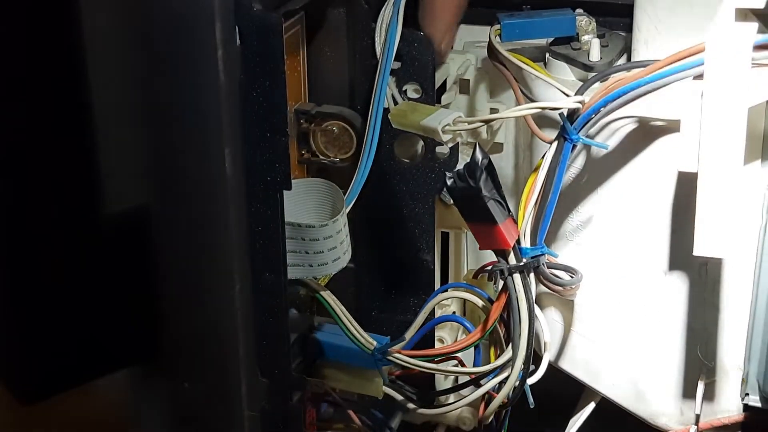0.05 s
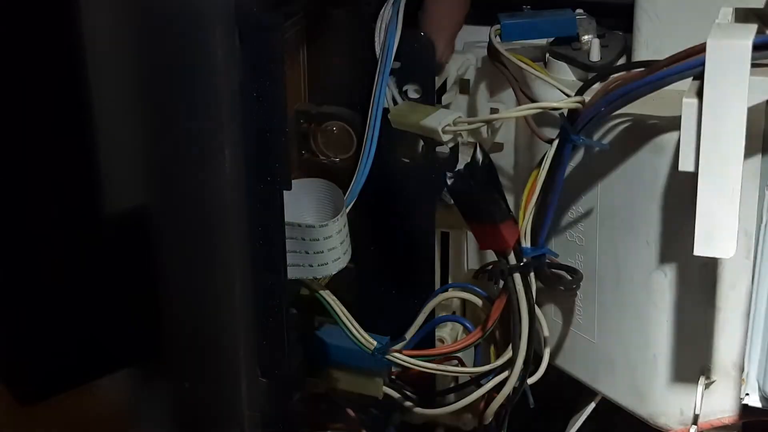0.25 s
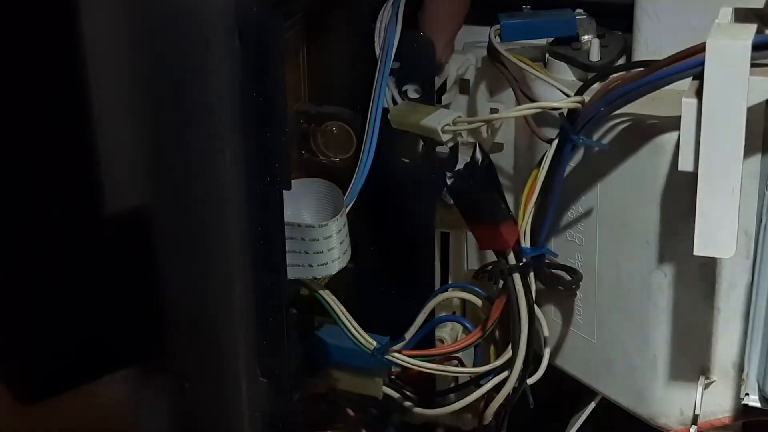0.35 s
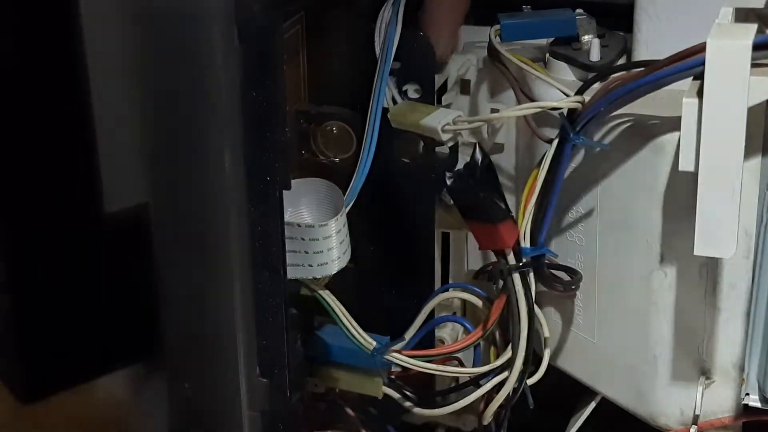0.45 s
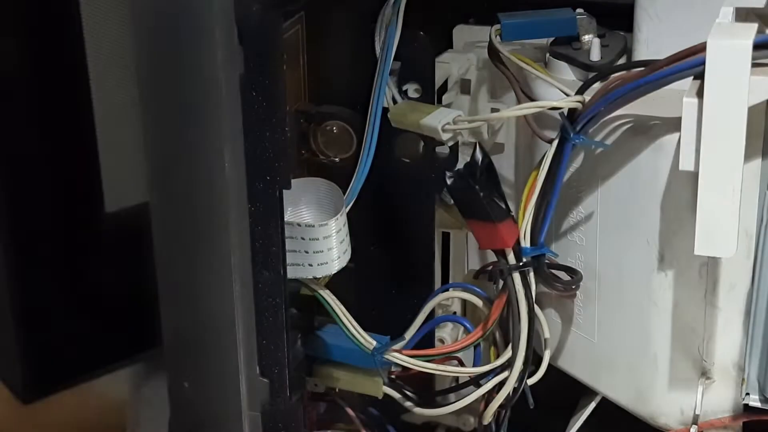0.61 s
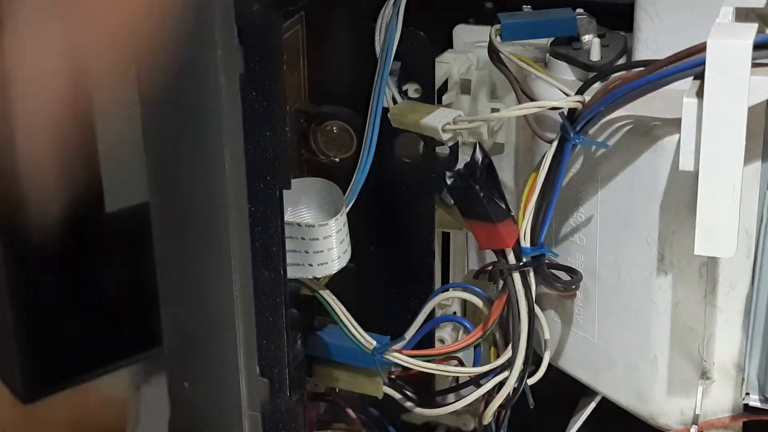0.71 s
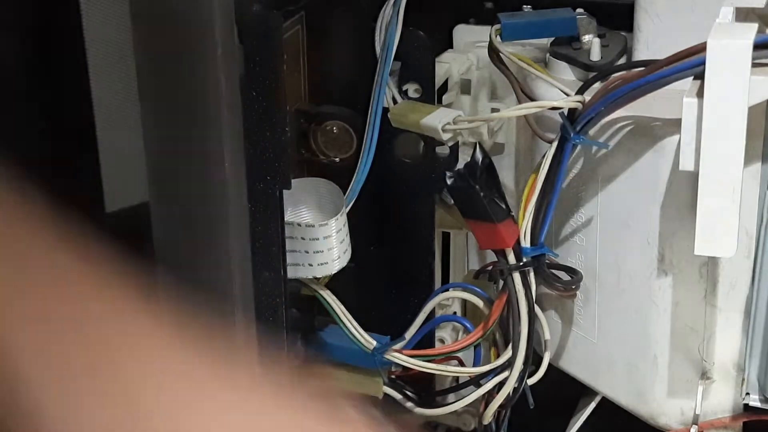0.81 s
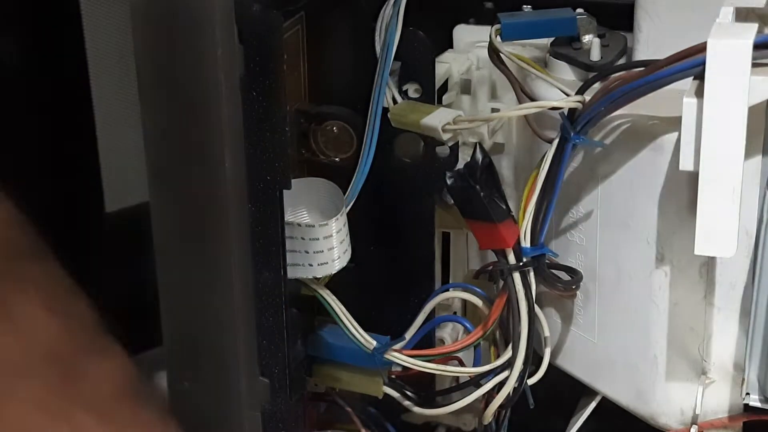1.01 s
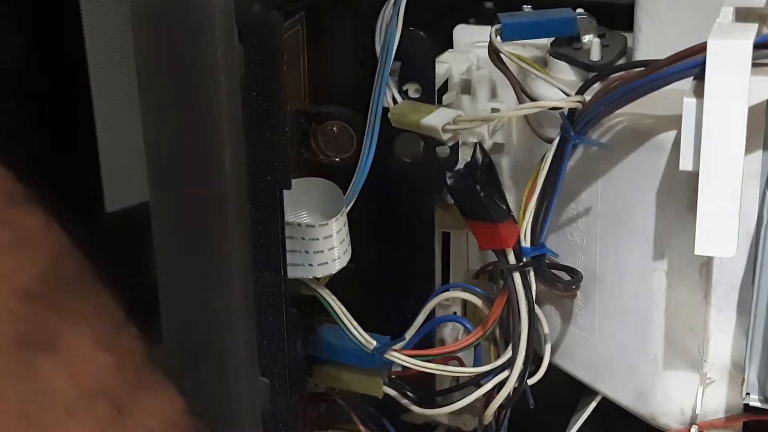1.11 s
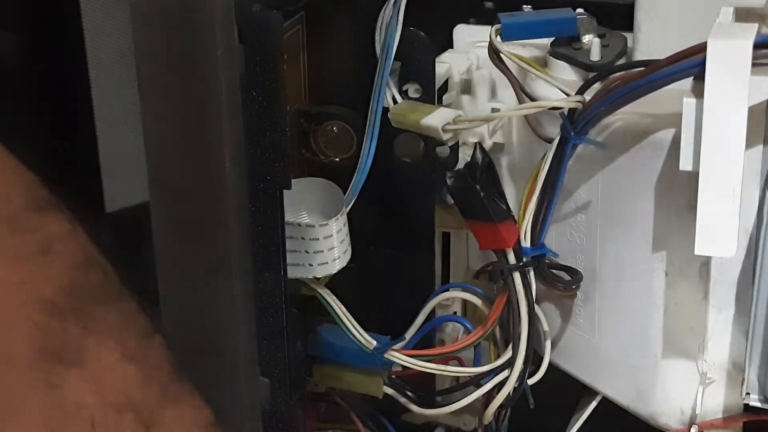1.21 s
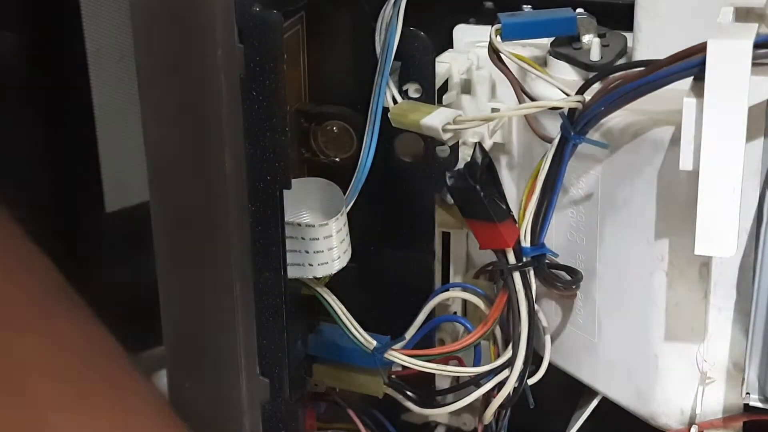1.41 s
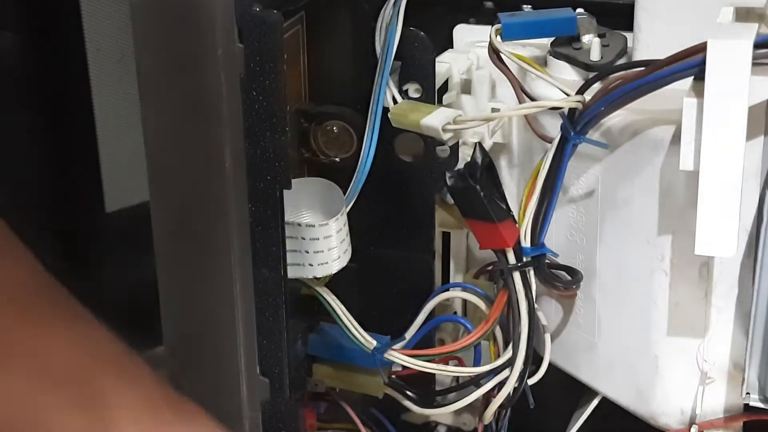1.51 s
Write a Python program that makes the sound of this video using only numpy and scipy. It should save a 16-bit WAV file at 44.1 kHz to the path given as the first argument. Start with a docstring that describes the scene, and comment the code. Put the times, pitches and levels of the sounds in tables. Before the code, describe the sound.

A microwave door bumps softly, then two latches snap shut in quick succession, rattling plastic and briefly ringing the steel cabinet. A hand faintly brushes the casing and air puffs at the close microphone, over low room hum.

```python
"""A low room hum and a hand brushing steel: an opened-up microwave oven in a small room, stereo mic close by.
The door bumps the latches with a dull thud and a short boom, and a hook ticks. Two latches then snap one after
the other, rattling loose plastic and ringing the sheet-steel cabinet. A faint squeak follows, then a soft touch
as a sleeve brushes past. A passing arm stirs the air at the microphone."""
import sys
import numpy as np
from scipy import signal
from scipy.fft import rfft, irfft, next_fast_len
from scipy.io import wavfile
from scipy.ndimage import uniform_filter1d, map_coordinates

SR = 44100
rng = np.random.default_rng(int(sys.argv[2]) if len(sys.argv) > 2 else 0)


def dump(signal):
    """Clip the signal to [-1, 1] and save it as 16-bit WAV at the path in sys.argv[1]."""
    limited = np.clip(np.atleast_2d(signal).T, -1, 1)
    pcm = np.round(limited * 32767).astype(np.int16)
    wavfile.write(sys.argv[1], SR, pcm)


N = 68355

# how alike the channels are, for close sound and for the room: freq_hz, correlation (capped at 1)
NEAR_ALIKE = [(60, 0), (180, 2), (550, 0.67), (1650, 0.2), (5000, 0)]
FAR_ALIKE = [(60, 0.34), (180, 1), (550, 0.58), (1650, .02)]
# stereo lean at the mic: freq_hz, left_minus_right_db
BALANCE = [(150, 1), (400, 3), (950, -.5), (2400, 2), (6000, -1), (11000, 3)]
# spectra of the noisy sounds: freq_hz, relative_db
HUM_COLOUR = [(25, -30), (100, -12.5), (240, -0.5), (470, -1), (750, -8.5), (1000, -7), (1600, -20.5),
              (4500, -40), (8000, -38), (15500, -54.5)]
BRUSH_COLOUR = [(300, 9.5), (1500, 7), (3500, -0.5), (8500, 3.5), (12500, 0), (15500, -1)]
DRAUGHT_COLOUR = [(20, -39.5), (45, -14), (100, -10), (160, -20), (300, -60.5)]
BUMP_COLOUR = [(140, -15), (240, 4.5), (400, 4.5), (640, -1.5), (1050, -6.5), (1500, -18), (3500, -37.5),
               (8000, -39), (15500, -49.5)]
ROOM_COLOUR = [(140, -8), (240, 0), (480, 6.5), (720, 0), (1200, -0.5), (1600, -11), (2400, -7),
               (3200, -10.5), (6000, -10), (8500, -17), (11500, -23), (15500, -24.5)]
CRACK_COLOUR = [(100, -25), (600, -5), (2500, 0), (6500, .5), (9000, -5), (12000, -4), (15500, -12)]
SNAP_COLOURS = [
    [(170, -8.5), (300, 1.5), (520, 8.5), (780, -6.5), (1100, 5), (1450, -2), (3000, -2.5), (4900, -15),
     (6400, -3), (9000, -14.5), (12500, -18.5), (15500, -28.5)],
    [(170, -2), (400, 5.5), (650, -0.5), (1200, 3.5), (1600, -5), (2800, -15), (3900, -11.5), (5800, -4.5),
     (7800, -16), (11200, -15.5), (15500, -32)],
]  # one spectrum for each latch
# decay of the oven's body and of the room: freq_hz, t60_s
BODY_T60 = [(200, 0.32), (500, 0.13), (1200, 0.1), (2500, 0.35), (7000, 0.19), (14000, 0.11)]
ROOM_T60 = [(200, .55), (600, .45), (2000, .53), (6000, .5), (10000, .38), (15000, .27)]
# the hum sinks toward the end: time_s, gain_db
HUM_SHAPE = [(0, -1), (.9, -0.5), (1.2, -3.5), (1.55, -6.5)]
# strokes of finger and sleeve: start_s, rise_s, hold_s, t60_s, level_db
BRUSHES = [(-.02, 0.066, 0.15, 0.23, -61), (0.158, 0.0021, 0.0056, 0.29, -59),
           (1.055, 0.0034, 0.1, 0.63, -56.5)]
# moving air on the mic: time_s, left_db, right_db
DRAUGHT = [(.3, -52, -58), (.36, -53, -45), (.55, -75, -49), (.62, -33.5, -64), (.68, -78, -65),
           (.79, -42.5, -44), (.93, -42.5, -54.5), (1.06, -43, -51), (1.13, -47, -55), (1.18, -67, -62.5)]
# pushes of air on its left side: centre_s, level_db
PUFFS = [(0.993, -26.5), (1.0429, -26.5), (1.112, -32)]
# loose plastic parts: start_s, level_db
CLICKS = [(0.2296, -38.5), (0.2377, -31), (0.4895, -21), (.5035, -16.5), (.5180, -21), (0.5388, -18.5),
          (0.5525, -22)]
# cabinet panel modes: pitch_hz, t60_s, bump_db, first_snap_db, second_snap_db
PANEL_MODES = [(171.8, 0.51, -28.5, -47, -25), (202.3, 0.34, -24.5, -35.5, -31),
               (232.6, 0.56, -23.5, -30.5, -26.5), (263.6, 0.46, -32, -24, -26.5),
               (341.5, 0.25, -39.5, -23, -29.5), (401.8, 0.19, -30, -16.5, -13),
               (424, 0.72, -28.5, -46.5, -41.5), (449.9, 0.56, -35, -29.5, -28.5),
               (508.8, 0.33, -39.5, -23.5, -30), (655.3, 0.082, -21.5, -36.5, -29),
               (834, 0.11, -32, -43, -17.5)]
# latch snaps: start_s, body_db, room_db
SNAPS = [(0.4841, -13, -16), (0.5395, -16, -21)]
# latch and bracket modes: pitch_hz, t60_s, first_snap_db, second_snap_db
LATCH_MODES = [(1079, 0.14, -19.5, -29.5), (1162, .3, -37.5, -35), (1335, 0.19, -49.5, -21.5),
               (1864, 0.3, -38.5, -25.5), (2202, 0.5, -33, -33.5), (5850, 0.09, -32.5, -21),
               (6340, 0.1, -21.5, -45.5), (11080, 0.54, -48, -46)]
# the squeak's arch: time_s, pitch_hz, level_db
SQUEAK_PATH = [(.87, 7300, -84), (.935, 7930, -62.5), (.975, 7370, -95)]

BUMP_S, BUMP_DB = .2302, -19.5
ATTACK_S, TICK_T60_S = .0007, .1


def amp(db):
    """Decibels to gain."""
    return 10 ** (np.asarray(db) / 20)


def unit(x):
    """Scale to rms 1."""
    return x / np.sqrt(np.mean(x ** 2) + 1e-20)


def along(points, hz):
    """Read (freq_hz, value) points on a log frequency axis."""
    freqs, values = np.transpose(points)
    return np.interp(np.log(hz + 1), np.log(freqs + 1), values)


def since(start_s):
    """Seconds since start_s, zero before it."""
    return np.maximum(np.arange(N) / SR - start_s, 0)


def curves(rows):
    """One value per sample for each column after the time."""
    times, *columns = np.transpose(rows)
    return np.array([np.interp(since(0), times, column) for column in columns])


def wobble(samples, shape=N):
    """Random motion of rms 1, smoothed over so many samples."""
    return unit(uniform_filter1d(rng.standard_normal(shape), size=samples))


def fade(start_s, t60_s, rise_s=ATTACK_S, hold_s=0):
    """A rise at start_s, with an exponential decay that begins hold_s later."""
    decay = np.exp(-np.log(1000) * since(start_s + hold_s) / t60_s)
    return decay * (1 - np.exp(-since(start_s) / rise_s))


def noise(colour, alike, ripple_db=0):
    """Coloured stereo noise of rms 1, as the mic hears it; ripple adds random narrow peaks."""
    size = next_fast_len(N + SR // 4)
    hz = np.fft.rfftfreq(size, 1 / SR)
    width = np.arccos(np.clip(along(alike, hz), -1, 1)) / 2
    mid, side = rfft(rng.standard_normal((2, size))) * [np.cos(width), np.sin(width)]
    lean_db = along(BALANCE, hz) / 2
    peaks = map_coordinates(rng.standard_normal(SR // 100), [hz / 55]) * np.clip(hz / 2000, 0, 1)
    db = along(colour, hz) + ripple_db * peaks + np.array([lean_db, -lean_db])
    return unit(irfft(np.array([mid + side, mid - side]) * amp(db), size)[:, :N])


def burst(start_s, colour, alike=NEAR_ALIKE, t60s=BODY_T60, rise_s=ATTACK_S):
    """Countless close resonances struck at once, each band dying at its own speed."""
    hz, t, bands = signal.stft(noise(colour, alike, ripple_db=4.5), SR, nperseg=128)
    decay_db = -60 * np.maximum(t - start_s, 0) / along(t60s, hz)[:, None]
    ring = signal.istft(bands * amp(decay_db), SR, nperseg=128)[1][:, :N]
    return ring * (1 - np.exp(-since(start_s) / rise_s))


def mode(start_s, hz, db, t60_s, rise_s=ATTACK_S):
    """One slightly unsteady resonance; high ones reach the two channels out of step."""
    start = round(start_s * SR)
    t = np.arange(N - start)[:SR * 2 // 3] / SR
    offset_rad = .82 * min(hz / 1000, 1) ** 2 * rng.choice([-1, 1])
    drift_rad = np.cumsum(rng.standard_normal(len(t))) * np.sqrt(min(hz * .0099, 15) / SR)
    phase = 2 * np.pi * hz * t + drift_rad + np.array([[offset_rad], [-offset_rad]])
    envelope = amp(db) * np.exp(-np.log(1000) * t / t60_s) * (1 - np.exp(-t / rise_s))
    out = np.zeros((2, N))
    out[:, start:start + len(t)] = envelope * np.sin(phase)
    return out


def room_hum():
    """Low, fan-like room tone with one thin, wavering whine."""
    whine_hz, waver_rad = 669.7, .22
    whine = amp(-54) * np.sin(2 * np.pi * whine_hz * since(0) + waver_rad * wobble(4000, shape=(2, N)))
    return amp(-49 + curves(HUM_SHAPE)) * noise(HUM_COLOUR, FAR_ALIKE) + whine


def hand():
    """Skin slides over the casing with a faint, grainy hiss; later a sleeve brushes past with a soft touch."""
    strokes = sum(amp(db) * fade(start_s, t60_s, rise_s, hold_s)
                  for start_s, rise_s, hold_s, t60_s, db in BRUSHES)
    grain_db = 1.3 * wobble(200)
    touch = amp(-50) * fade(1.057, TICK_T60_S) * noise(ROOM_COLOUR, FAR_ALIKE)
    return touch + strokes * amp(grain_db) * noise(BRUSH_COLOUR, FAR_ALIKE)


def air():
    """The arm stirs the air at the mic: a rumble unrelated between channels, and soft puffs on the left."""
    puff_width_s = .0027
    out = amp(curves(DRAUGHT)) * noise(DRAUGHT_COLOUR, alike=[(50, .022)])
    for centre_s, db in PUFFS:
        u = (since(0) - centre_s) / puff_width_s
        out[0] += amp(db) * u * np.exp((1 - u ** 2) / 2)
    return out


def door():
    """The door meets the latches softly and knocks once more; a hook then ticks over its ramp."""
    rebound_s, tick_s = .2455, .4543
    bump = burst(BUMP_S, BUMP_COLOUR)
    rebound = burst(rebound_s, BUMP_COLOUR)
    bump_room = amp(-3) * burst(BUMP_S, BUMP_COLOUR, FAR_ALIKE, ROOM_T60, rise_s=.066)
    tick = noise(SNAP_COLOURS[0], NEAR_ALIKE) * fade(tick_s, TICK_T60_S)
    tick_room = amp(-22) * burst(tick_s, ROOM_COLOUR, FAR_ALIKE, ROOM_T60, rise_s=.0056)
    return amp(BUMP_DB) * (bump + bump_room) + amp(-26.5) * rebound + amp(-33.5) * (tick + tick_room)


def rattle():
    """Loose plastic parts click drily with the bump and the snaps."""
    clicks = sum(amp(db) * fade(start_s, t60_s=.016) for start_s, db in CLICKS)
    return clicks * noise(CRACK_COLOUR, NEAR_ALIKE)


def boom():
    """After the bump the hollow box booms once, swelling and rising a little in pitch."""
    pitch_hz, glide_hz_per_s, peak_s = 187.1, 340, .058
    t = since(BUMP_S)
    swell = t / peak_s * np.exp((1 - (t / peak_s) ** 2) / 2)
    phase = 2 * np.pi * (pitch_hz * t + glide_hz_per_s * t ** 2 / 2)
    return amp(-24.5) * swell * np.sin(phase)


def cabinet():
    """The bump and both snaps ring the same steel panels; the big low ones are slowest to get going."""
    blows_s = [BUMP_S] + [start_s for start_s, *_ in SNAPS]
    ring = sum(mode(start_s, hz, db, t60_s, rise_s=.045 * (181 / hz) ** 3)
               for hz, t60_s, *levels_db in PANEL_MODES for start_s, db in zip(blows_s, levels_db))
    return ring * amp([[1.03], [-1.03]])  # the panels lie left of the mic


def latches():
    """Each snap: a hard, chattering crack, the plastic frame's clatter, the room and the bracket's ring."""
    out = np.zeros((2, N))
    for k, (start_s, body_db, room_db) in enumerate(SNAPS):
        chatter = unit(amp(3 * wobble(30)))
        out += amp(-12.5) * chatter * noise(CRACK_COLOUR, NEAR_ALIKE) * fade(start_s, t60_s=.04)
        out += amp(body_db) * burst(start_s, SNAP_COLOURS[k])
        out += amp(room_db) * burst(start_s, ROOM_COLOUR, FAR_ALIKE, ROOM_T60, rise_s=.043)
        out += sum(mode(start_s, hz, levels_db[k], t60_s) for hz, t60_s, *levels_db in LATCH_MODES)
    return out


def steel_wall():
    """Both snaps set the same crowd of high modes ringing in the thin steel wall."""
    low_hz, high_hz, tilt_db_per_octave = 1205, 7640, 1.4
    out = np.zeros((2, N))
    for place, strength in rng.random((60, 2)):
        hz = low_hz + place * (high_hz - low_hz)
        db = -48.5 + tilt_db_per_octave * np.log2(hz / low_hz) + 10 * (strength - .5)
        for start_s, *_ in SNAPS:
            out += mode(start_s, hz, db, t60_s=.19)
    return out


def squeak():
    """A very faint, thin squeak arches up and down after the snaps."""
    hz, db = curves(SQUEAK_PATH)
    rough_hz = 190 * wobble(60)
    sounding = (since(0) > SQUEAK_PATH[0][0]) & (since(0) < SQUEAK_PATH[-1][0])
    return sounding * amp(db) * np.sin(2 * np.pi * np.cumsum(hz + rough_hz) / SR)


def scene():
    """Everything at the mic, close to the oven."""
    low_cut = signal.butter(3, 140, "high", fs=SR, output="sos")  # the knocks, snaps and rattle carry little below 140 Hz
    blows = signal.sosfilt(low_cut, door() + latches() + rattle())
    return blows + boom() + cabinet() + steel_wall() + squeak() + hand() + air() + room_hum()


def record(dry):
    """The recorder rounds off the highest peaks and keeps nothing above its band limit."""
    ceiling, top_hz = .9, 15900
    rounded = dry / (1 + np.abs(dry / ceiling) ** 6) ** (1 / 6)
    return signal.sosfilt(signal.ellip(10, .1, 90, top_hz, fs=SR, output="sos"), rounded)


dry = scene()
out = record(dry)
dump(out)
```